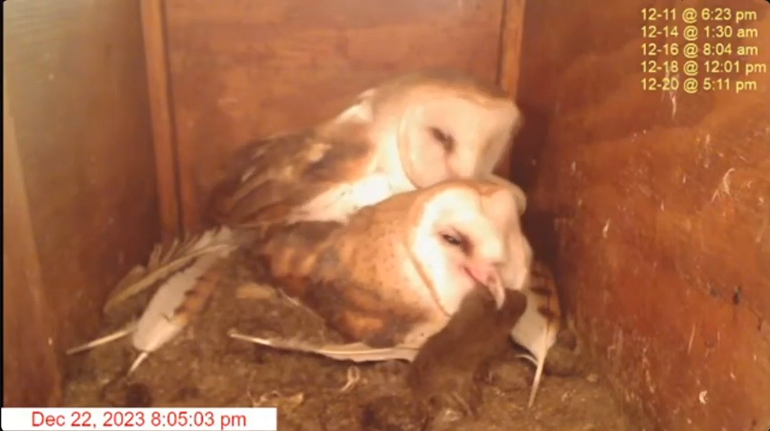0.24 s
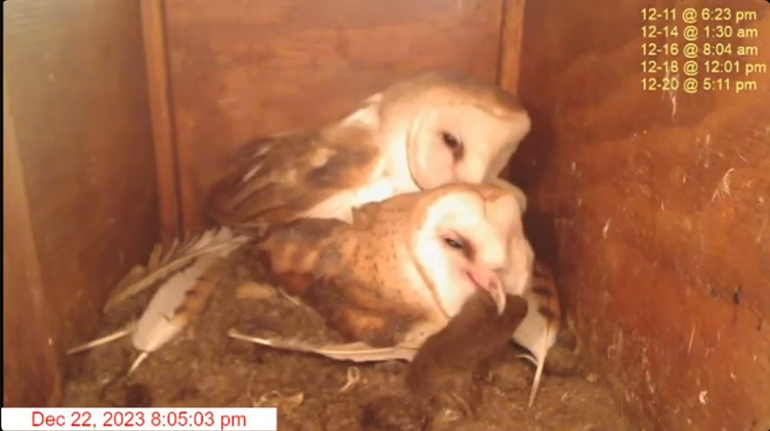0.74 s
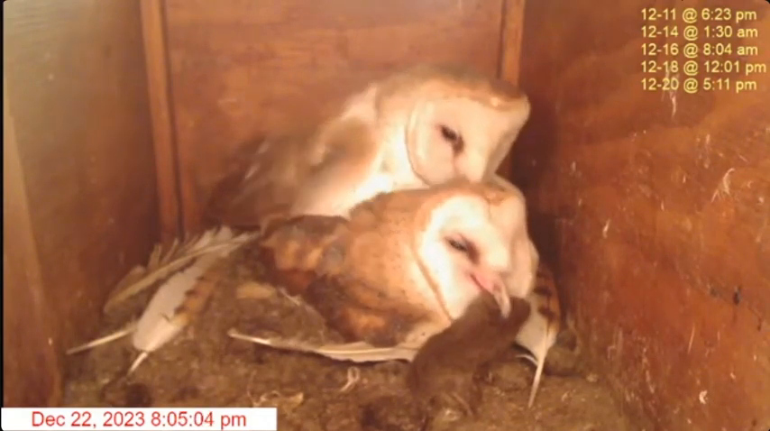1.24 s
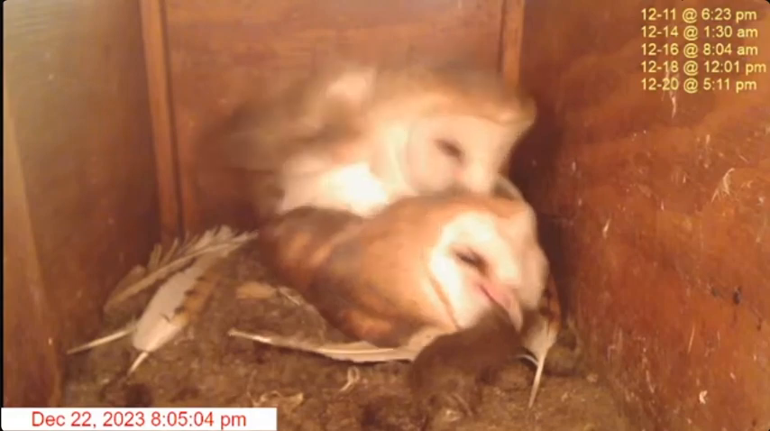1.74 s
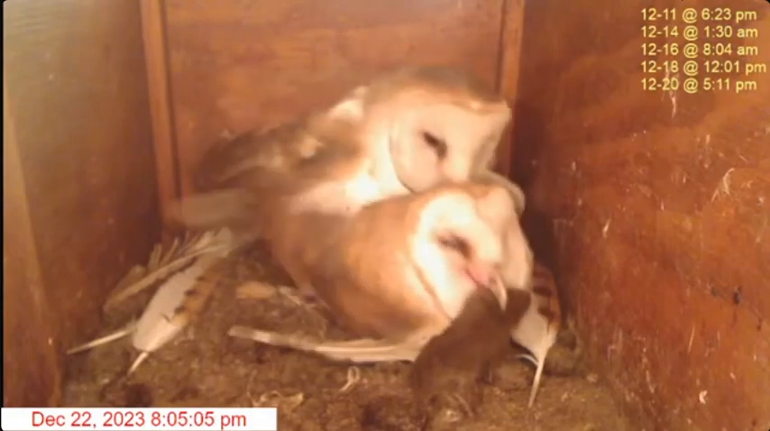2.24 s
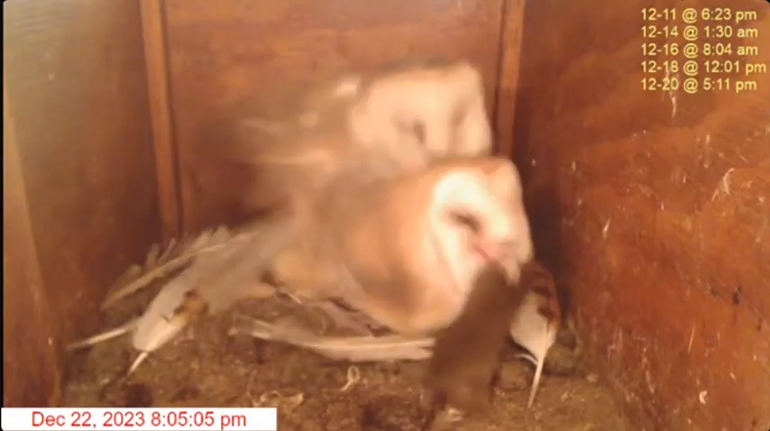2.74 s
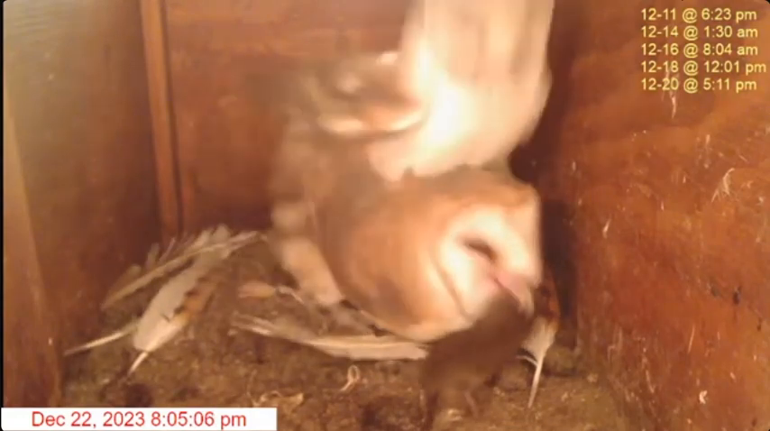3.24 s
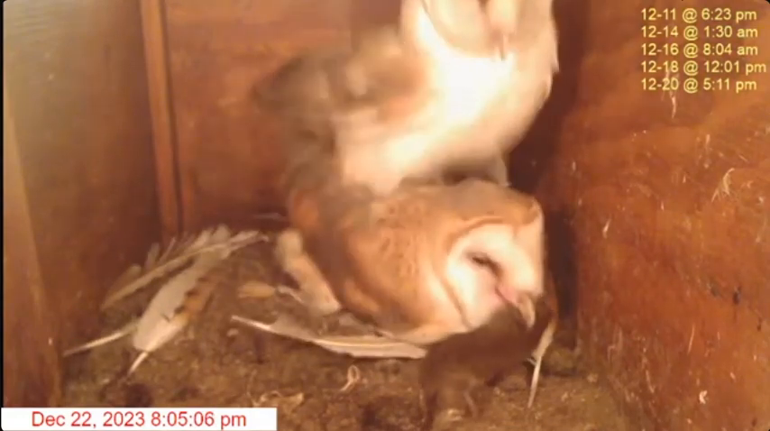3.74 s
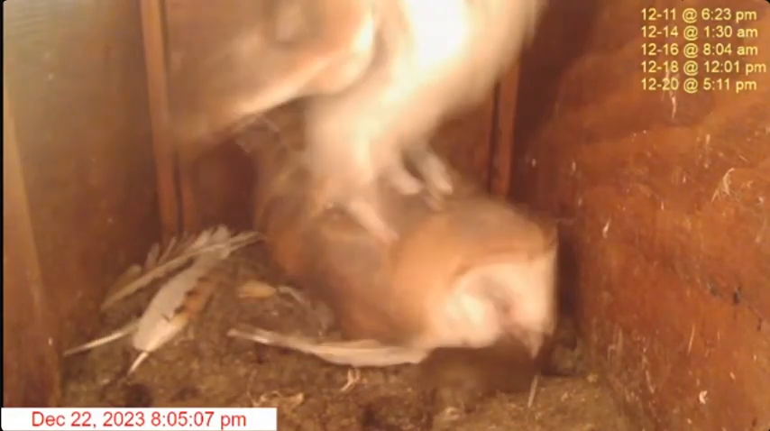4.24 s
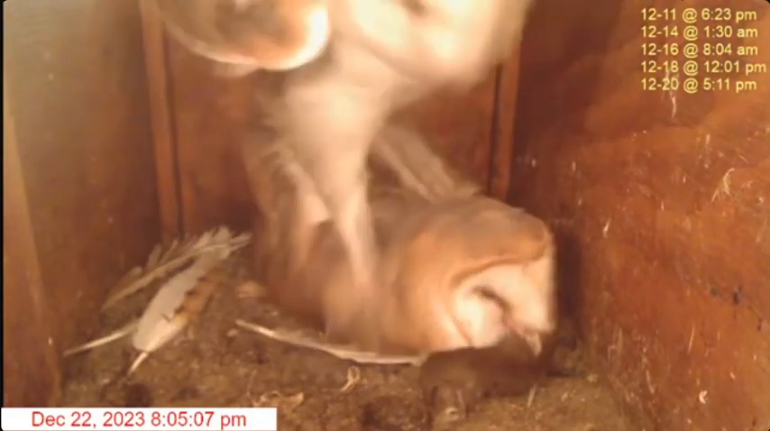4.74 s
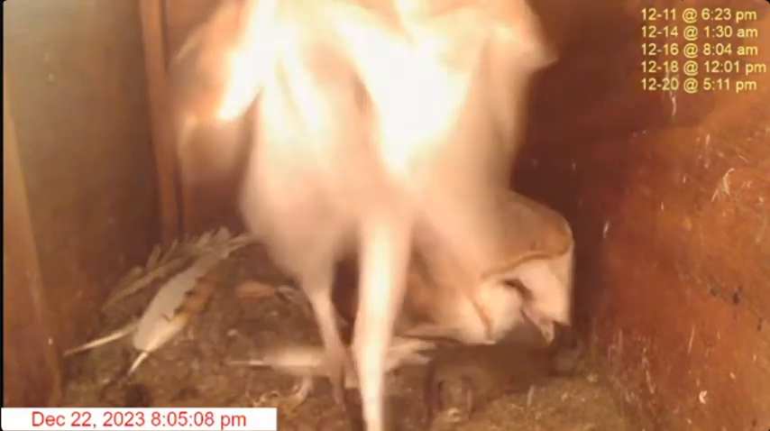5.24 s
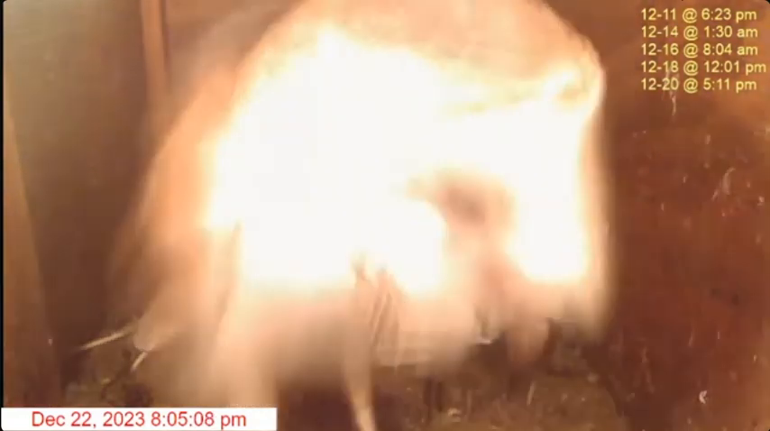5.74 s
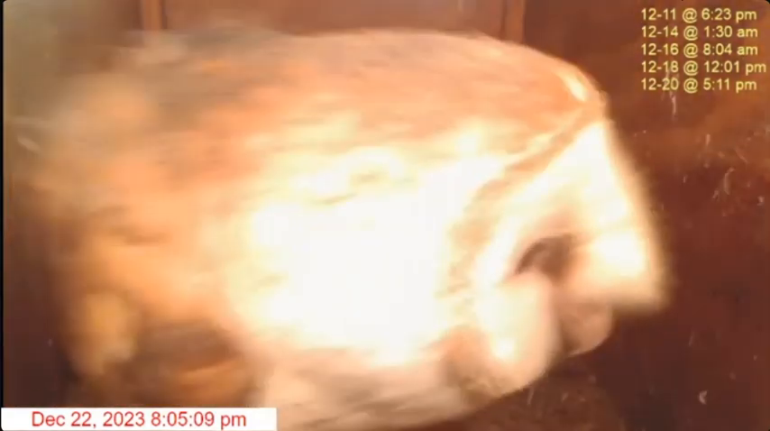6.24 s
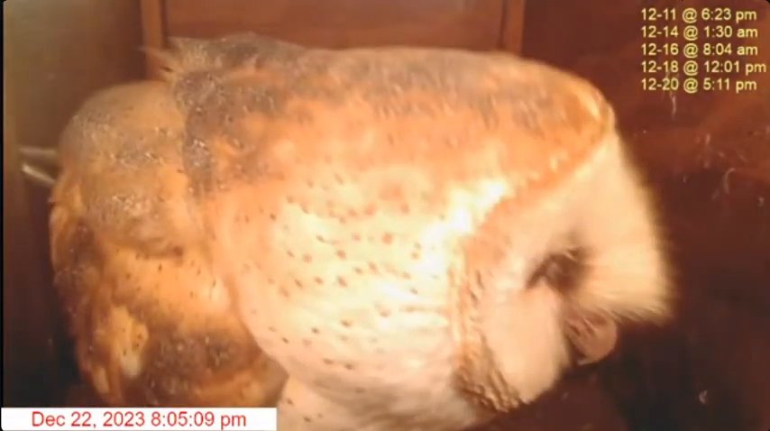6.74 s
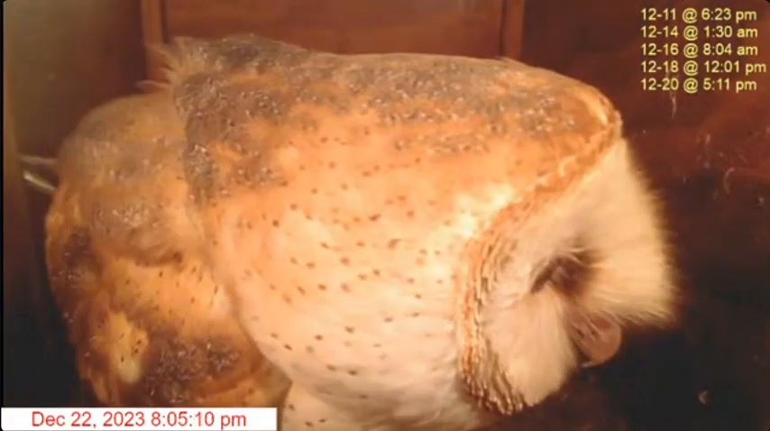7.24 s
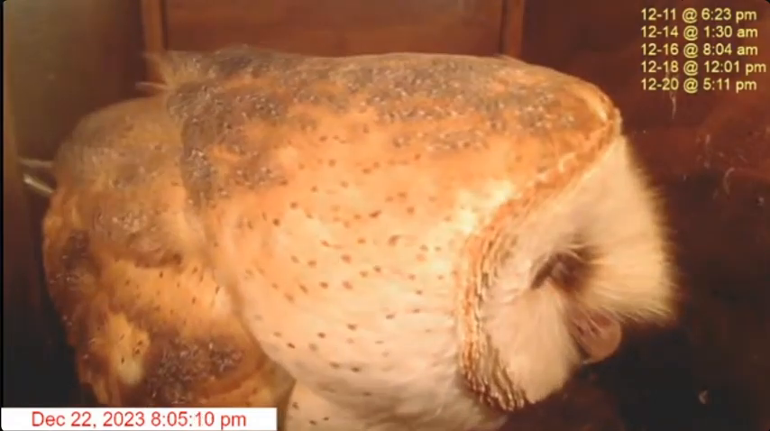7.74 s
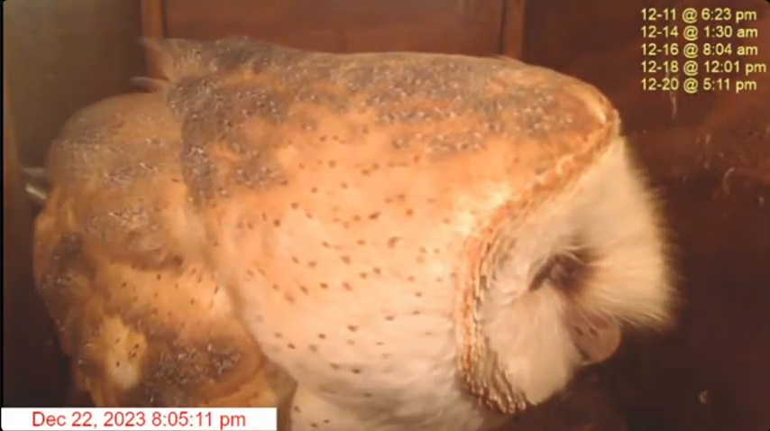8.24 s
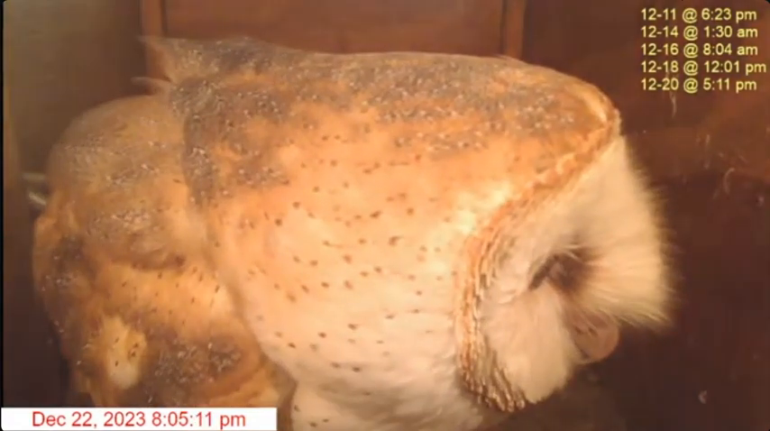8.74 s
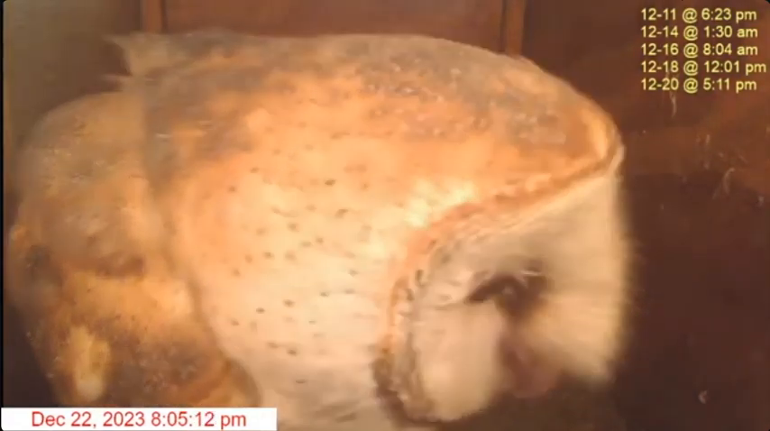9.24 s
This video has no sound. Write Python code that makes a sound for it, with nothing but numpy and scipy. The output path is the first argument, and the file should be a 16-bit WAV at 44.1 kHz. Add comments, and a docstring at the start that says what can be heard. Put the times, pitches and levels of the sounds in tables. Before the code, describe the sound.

Barn owls at close range in a dry, boxy wooden space: first a rattling squeal, a pause, then another squeal tearing into harsh raspy screams for about two seconds. Short chirpy squeals follow, then drawn-out, whistle-like calls with slight cracks and gaps between them. Dull padded foot bumps, one soft wing blow and light wall knocks accompany the movement over quiet low hum and trace hiss.

```python
"""Inside a wooden nest box, two barn owls call close to the microphone over a faint low hum.
Thin squeals, some led in by a beak click, are gliding tones with overtones; they rattle as the tone slips
and crack into rasps of patchy noise. Harsh screeches are smeared harmonics and noise through a changing throat.
Feet and knocks ring decaying wood modes; feathers, hoarse breaths and a wing slap are shaped noise."""
import sys
import numpy as np
from scipy import signal
from scipy.fft import rfft, irfft, next_fast_len
from scipy.io import wavfile
from scipy.ndimage import uniform_filter1d

SR = 44100
rng = np.random.default_rng(int(sys.argv[2]) if len(sys.argv) > 2 else 0)


def transcribe(signal):
    """Save signal, clipped to [-1, 1], as a 16-bit WAV file at the path in sys.argv[1]."""
    frames = np.atleast_2d(signal).T
    limited = np.clip(frames, -1, 1)
    pcm = np.round(limited * 32767).astype(np.int16)
    wavfile.write(sys.argv[1], SR, pcm)


N = 418068
T = np.arange(N) / SR


def amp(db):
    """Decibels to gain."""
    return 10 ** (np.asarray(db) / 20)


def evened(x):
    """Scales to rms 1."""
    return x / np.sqrt(np.mean(x ** 2) + 1e-20)


def add(mix, start_s, sound):
    """Mixes a sound in at its start time."""
    part = mix[max(round(start_s * SR), 0):][:len(sound)]
    part += sound[:len(part)]


def coloured(x, points):
    """Weights the spectrum of x by a (Hz, dB) curve, then scales to rms 1."""
    hz, db = np.transpose(points)
    f = np.fft.rfftfreq(len(x), 1 / SR)
    gain = amp(np.interp(np.log(f + 1), np.log(hz + 1), db))
    return evened(irfft(rfft(x) * gain, len(x)))


def noise(points, size):
    """Noise coloured by a (Hz, dB) curve, about rms 1."""
    return coloured(rng.standard_normal(next_fast_len(size)), points)[:size]


def wander(hz, size):
    """Smooth chance of about rms 1 that moves up to about hz times a second."""
    padded = next_fast_len(size + SR // 8)
    f = np.fft.rfftfreq(padded, 1 / SR)
    spectrum = rfft(rng.standard_normal(padded)) * np.exp(-.5 * (f / hz) ** 2)
    return evened(irfft(spectrum, padded))[:size]


def curves(rows):
    """Sample times and every column of a curve table, joined by straight lines."""
    s, *columns = np.transpose(rows)
    t = np.arange(s[0], s[-1], 1 / SR)
    return [t] + [np.interp(t, s, c) for c in columns]


def gate(t, start, end, edge=0.013):
    """Opens between start and end with smooth edges; spans shorter than an edge stay below one."""
    return np.sin(np.pi / 2 * np.clip(np.minimum(t - start, end - t) / edge + .5, 0, 1)) ** 2


def phase_of(hz):
    """Running phase of a frequency curve."""
    return 2 * np.pi * np.cumsum(hz) / SR


def faded(x):
    """Softens both ends over three thousandths of a second."""
    return x * signal.windows.tukey(len(x), .006 * SR / len(x))


def envelope(t, release):
    """Quick 9.3 ms attack, hold, smooth release."""
    attack = np.minimum((t - t[0]) / 0.0093, 1)
    return attack * np.sin(np.pi / 2 * np.clip((t[-1] - t) / release, 0, 1)) ** 2


def patchy(x):
    """Chaos favours one band, then another, for a few hundredths of a second at most."""
    z = signal.stft(x, nperseg=512)[2]
    patches = uniform_filter1d(rng.standard_normal(z.shape), 5, 0)  # smoothed over frequency
    patches = uniform_filter1d(patches, 3, 1)  # and over time
    return signal.istft(z * amp(2.3 * evened(patches)), nperseg=512)[1][:len(x)]


def saturated(x, drive=0.85):
    """Rounds off the largest swings, low-passing the distortion this adds at 8200 Hz."""
    sos = signal.butter(10, 8200, fs=SR, output="sos")
    return evened(x + signal.sosfiltfilt(sos, np.tanh(drive * x) / drive - x))


# colour of the hum and hiss in the box: (frequency_hz, relative_level_db)
HUM_COLOUR = [(12, -76.5), (20, -50), (48, -37.5), (91, -6), (114, -5.5), (161, -14), (244, -10.5),
              (352, -30.5), (810, -34.5), (1610, -30.5), (1960, -44.5), (7000, -57), (9100, -91.5),
              (15400, -120)]
HUM_DB = -56.5  # before its low part swells


def hum(swell_db=2.5, low_hz=330):
    """A low, uneven hum in the box under a trace of steady hiss: noise whose low part swells at random."""
    steady = noise(HUM_COLOUR, N)
    low = signal.sosfiltfilt(signal.butter(2, low_hz, fs=SR, output="sos"), steady)
    swell = amp(swell_db * wander(6.8, N))
    return amp(HUM_DB) * (steady + low * (swell - 1))


# squeals close to the microphone: (level_db before the next two changes, fade_db over the call,
# pinch_db change at the top pitch, edge_db lift of the fourth harmonic, rasp_db of the rattle's puffs,
# release_s, pitch curve [(time_s, pitch_hz before sag and drift)])
SQUEALS = [ (-19, -4, -2.5, 1.5, -5.5, 0.048, [(0, 2043), (.022, 2170), (.05, 2058), (.3, 2065),
           (.34, 1937)]), (-19, 0, -3, -0.5, -9, .06, [(1.033, 1648), (1.09, 1725), (1.145, 1829),
           (1.19, 1714), (1.28, 1808), (1.312, 1920), (1.355, 1734), (1.38, 1857), (1.52, 1915),
           (1.565, 1760)]), (-29.5, 1.5, 4, 1, -17.5, 0.025, [(1.555, 1600), (1.585, 1480), (1.64, 1526),
           (1.69, 1434)]), (-19, -1, -8.5, -2, -3.5, 0.06, [(1.682, 2158), (1.705, 2074), (1.79, 2043)]),
           (-23, -3.5, 2.5, -13, -10, 0.024, [(3.005, 2150), (3.045, 1910)]),
           (-19, -6, -4.5, 2, -10, 0.04, [(3.335, 2190), (3.36, 2060), (3.385, 1750)]),
           (-20, -0.5, -12.5, 1, -5.5, 0.047, [(3.764, 1650), (3.785, 1810), (3.83, 1780), (3.855, 1900),
           (3.9, 1780), (3.975, 1700), (4.028, 1910), (4.056, 1546)]),
           (-16, 2.5, -8.5, -2.5, -14.5, 0.03, [(4.487, 1552), (4.53, 1592), (4.568, 1779), (4.62, 1668),
           (4.69, 1725), (4.75, 1656), (4.82, 1718), (4.875, 1654), (4.915, 1669), (4.972, 1606),
           (5.0, 1450)]), (-27.5, -2, -1, -27, -20, 0.0099, [(5.066, 2350), (5.077, 2270), (5.095, 2130)]),
           (-20.5, -8, 9, -44, -20, 0.013, [(5.122, 2330), (5.138, 2100), (5.147, 1675), (5.167, 1360)]),
           (-13.5, -5.5, -11.5, -6.5, -17.5, 0.04, [(5.527, 1572), (5.615, 1659), (5.7, 1634), (5.86, 1640),
           (5.895, 1692), (5.92, 1606), (6.005, 1697), (6.07, 1638), (6.114, 1665), (6.15, 1579),
           (6.21, 1714), (6.293, 1540)]), (-15.5, 0, -7, 12.5, -12, 0.048, [(7.22, 1580), (7.3, 1689),
           (7.352, 1598), (7.415, 1639), (7.55, 1605), (7.63, 1537), (7.658, 1514)]),
           (-17, 1, -6, 11.5, -10, 0.037, [(8.735, 1568), (8.836, 1715), (8.89, 1610), (8.94, 1656),
           (9.0, 1616), (9.07, 1660), (9.1, 1551), (9.14, 1507)])]
# stretches where the voice rattles: (start_s, end_s, slip_depth 0-1)
RATTLES = [(0, 0.293, 0.74), (1.038, 1.064, 0.91), (1.502, 1.676, .9), (1.718, 1.78, 0.26),
           (3.763, 3.817, .7), (3.87, 3.89, 0.95), (4.007, 4.064, 0.87), (4.479, 4.542, 0.69),
           (4.741, 4.764, 0.57), (4.879, 4.899, 0.28), (5.118, 5.141, 0.44), (5.537, 5.585, 0.68),
           (5.663, 5.681, 0.55), (5.794, 5.805, 0.7), (7.22, 7.286, .72), (7.357, 7.373, 0.53),
           (7.443, 7.601, 0.56), (8.738, 8.793, 0.98), (8.81, 8.828, 0.41), (8.895, 9.054, 0.66)]
# overtones by pitch, before the edge lift:
# (pitch_hz, second_db, third_db, fourth_db relative to the first harmonic)
OVERTONES = [(1510, -29, -41, -53), (1616, -25.5, -49, -31), (1666, -23, -39, -25.5),
             (1713, -19, -21.5, -21.5), (1810, -13, -7.5, -10.5), (1916, -11, -8, -12.5),
             (2000, -13, -7, -28.5), (2240, -13.5, -17.5, -39.5)]
SECOND_EDGE_SHARE, THIRD_EDGE_SHARE = .15, 0.34  # share of a call's edge_db given to these harmonics
FIFTH_DB = -18  # relative to the fourth harmonic
RECORDER_TOP_HZ, RECORDER_FALL_DB_PER_HZ = 8050, 0.1  # the recorder's top edge dims the fifth harmonic
LEAK_DB = -46.5  # air under even the purest note, relative to the call's level
PINCH_WIDTH_HZ = 46  # how near the top pitch the pinch acts
RATTLE_SAG = .055  # share of the pitch lost in a full rattle
# colour of the puffs in a rattle: (frequency_hz, relative_level_db)
PUFF_COLOUR = [(30, -19.5), (400, -0.5), (800, -9.5), (1100, 12), (1900, -5.5), (2300, 5), (2800, 2),
               (3700, -9), (4300, 2), (5000, -18.5), (6600, 1.5), (7900, -9.5), (8600, -27), (9300, -59)]


def squeal(db, fade_db, pinch_db, edge_db, rasp_db, release, pitch, slip_hz=135, slip_lag=1.9,
           flutter_hz=380, flutter=0.11, shiver=0.33, air_db=-15):
    """The syrinx whistles; in a rattle it slips again and again, losing strength and lagging in phase."""
    t, hz = curves(pitch)
    size = len(t)
    depth = sum(np.clip(d, 0, 1) * gate(t, a, b) for a, b, d in RATTLES)
    cracked = np.clip(sum(gate(t, s - w / 2, s + w / 2) for s, w, _ in STUTTER + CRACKS), 0, 1)
    pinch = np.exp((hz - hz.max()) / PINCH_WIDTH_HZ)
    swell = envelope(t, release)  # applied twice to overtones and rasp, so they die sooner than the note
    level = swell * amp(db + fade_db * np.linspace(0, 1, size) + pinch_db * pinch)
    hz = hz * (1 - RATTLE_SAG * depth)

    # the harder the bird presses, the higher and, broadly, the brighter the note
    steps, *harmonics = np.transpose(OVERTONES)
    second_db, third_db, fourth_db = [np.interp(hz, steps, h) for h in harmonics]
    second_db = second_db + SECOND_EDGE_SHARE * edge_db
    third_db = third_db + THIRD_EDGE_SHARE * edge_db
    fourth_db = fourth_db + edge_db
    fifth_db = fourth_db + FIFTH_DB - RECORDER_FALL_DB_PER_HZ * np.maximum(5 * hz - RECORDER_TOP_HZ, 0)

    # the pitch sags into each crack and comes out of it high
    bend = sum((t - s) / w * np.exp(-((t - s) / w) ** 2) for s, w, _ in STUTTER + CRACKS)
    waver = wander(15, size)  # the note softens as it drifts sharp
    strain = amp(np.minimum(third_db, -8))  # a pressed note is less steady
    drift = .11 * bend + (.002 + .035 * strain) * wander(70, size) + .005 * waver

    cycle = phase_of(slip_hz * np.exp(0.41 * wander(90, size)))
    slips = depth * np.cos(cycle / 2) ** 6
    lag = slip_lag * depth * np.sin(cycle) / (2 - np.cos(cycle)) * wander(64, size)
    lag += (flutter * depth + 0.0062) * wander(flutter_hz, size)  # the clear note keeps a trace of flutter
    phase = phase_of(hz * (1 + drift))
    levels = [second_db, third_db, fourth_db, fifth_db]
    overtones = sum(amp(h) * np.sin(k * phase + 2 * lag) for k, h in enumerate(levels, 2))

    strength = (1 - slips) * (1 + shiver * depth * wander(flutter_hz, size))
    strength *= (1 + 0.041 * depth) * (1 - .5 * cracked)
    strength *= amp(-.7 * waver + 4 * strain * wander(50, size))
    # pressed hard, a slower vibration joins in
    sidebands = 1 + amp(third_db - 7.5) * np.sin(phase / np.e + wander(60, size))
    tone = np.sqrt(2) * strength * (np.sin(phase + lag) + swell * overtones * sidebands)

    # a pressed voice leaks more air
    leak = amp(LEAK_DB) + amp(air_db + np.maximum(third_db, fourth_db - 11))
    air = leak * noise(CRACK_COLOUR, size)
    # each slip lets a puff of air through
    puffs = (.45 * depth + 1.1 * slips) * noise(PUFF_COLOUR, size)
    return t[0], faded(level * (tone + air + swell * amp(rasp_db) * puffs))


# single short rasps: (middle_s, length_s, level_db before the common cut)
CRACKS = [(1.112, .006, -14), (1.211, 0.0077, -12.5), (1.275, 0.0088, -12), (1.407, 0.015, -12),
          (1.444, 0.011, -15), (1.506, 0.0037, -10), (3.772, 0.0058, -18.5), (3.805, 0.0035, -23),
          (3.842, 0.008, -14), (3.871, 0.0112, -12.5), (3.945, 0.0058, -16.5), (3.982, 0.008, -23),
          (4.015, 0.014, -12.5)]
# the opening call stutters: a run of eight evenly spaced cracks that grows louder, same columns
STUTTER_START_S, STUTTER_PERIOD_S, STUTTER_LENGTH_S = .05, .0327, .019
STUTTER_DB, STUTTER_GROWTH_DB = -15, 0.61  # first crack before the common cut, rise per crack
STUTTER = [(STUTTER_START_S + k * STUTTER_PERIOD_S, STUTTER_LENGTH_S, STUTTER_DB + k * STUTTER_GROWTH_DB)
           for k in range(8)]
# colour of cracks and leaking air: (frequency_hz, relative_level_db)
CRACK_COLOUR = [(20, -20.5), (150, 1.5), (400, -10.5), (1000, -4.5), (1500, 7.5), (2200, 3.5), (3000, -6.5),
                (4200, 0), (4800, -4.5), (5600, 2), (7500, 1), (8300, -14), (9100, -40), (16000, -52)]


def cracks(cut_db=-2.0):
    """For a few thousandths of a second the syrinx turns chaotic: gated patchy noise with rounded peaks."""
    level = sum(amp(db) * gate(T, s - w / 2, s + w / 2, edge=0.0042) for s, w, db in STUTTER + CRACKS)
    return amp(cut_db) * level * saturated(evened(patchy(noise(CRACK_COLOUR, N))))


# bill closing: (start_s, level_db before the gain and the noise)
BEAK_CLICKS = [(0.994, -20), (3.707, -24.5), (4.395, -26), (5.44, -22), (7.172, -25.5), (8.684, -25)]
# colour of the bill: (frequency_hz, relative_level_db)
BEAK_COLOUR = [(100, -15), (400, -16), (750, 12), (1200, -2), (1600, 5), (2300, 2), (3100, -49.5),
               (4300, -29), (5200, -31), (7000, -23.5), (9000, -61)]


def beak_click(s, db, lead=.004, ring=0.0013, tail_db=-25, tail=0.04, gain_db=-7):
    """The bill closes with a soft snap, and the box rings briefly: a noise pulse with a faint tail."""
    t = np.arange(SR // 16) / SR
    snap = (t / ring) ** 4 * np.exp(-t / ring)
    box_tail = amp(tail_db) * np.exp(-t / tail) * np.minimum(t / lead / 2, 1)
    shape = snap / snap.max() + box_tail
    return s - lead, amp(db + gain_db) * shape * noise(BEAK_COLOUR, len(t))


# curves of the screeches; the first two join into one long screech with a brief dip:
# (time_s, level_db before throb and grain,
# throat_posture: 0 = shut growl, 1 = wide scream, 2 and above = hollow rasp)
SCREECHES = [
    [(1.455, -32, 0.29), (1.52, -25, 0.66), (1.59, -26.5, 0), (1.68, -25.5, 0.0062), (1.72, -19, 0.92),
     (1.85, -16, 0.95), (2.12, -15.5, 1.085), (2.54, -15.5, 1.42), (2.6, -19, 1.93), (2.732, -16.5, 1.9)],
    [(2.718, -23.5, 1.87), (2.755, -18, 2.6), (2.78, -23.5, 1.83), (2.835, -20, 1.7)],
    [(3.004, -29, .4), (3.05, -16.5, 0.81), (3.17, -16.5, 0.87), (3.33, -16, 1.14), (3.38, -34, 1.13)],
]
# colours of the three throat postures: (frequency_hz, relative_level_db)
GROWL = [(100, -28), (450, -9), (1200, -6), (1480, -1), (1800, -7.5), (3100, -26), (3800, -30.5),
         (4900, -36.5), (6300, -29), (8300, -43.5), (9000, -79)]
SCREAM = [(20, -10), (55, -13), (155, 4), (400, -10), (1100, -3.5), (1700, -3), (2400, -1), (2850, -6.5),
          (4300, -5.5), (5400, -2), (7700, -4), (8300, -18.5), (9100, -36), (16000, -43.5)]
HOLLOW = [(25, -7.5), (150, 2), (700, -2), (1500, -2), (2250, -17.5), (2750, -8.5), (3200, 1), (4100, -17),
          (5000, -9.5), (6300, 3.5), (7900, -4), (8500, -19.5), (9300, -50.5)]


def screech(rows, pitch_hz=2100, sag=.24, voiced_db=-1, throb_hz=29.9, throb_db=2.0, grain=0.15, release=0.039):
    """Chaotic vibration: smeared harmonics and turbulence pass a changing throat, throbbing about 30 Hz."""
    t, db, posture = curves(rows)
    size = len(t)
    hz = pitch_hz * (1 - sag * np.minimum(2 * abs(posture - 1), 1))  # highest in the wide scream
    lurch = .12 * np.clip(posture, .3, 1) * wander(45, size)
    chaos = .05 + .1 * np.exp(.7 * wander(30, size))  # at its low moments the syrinx nearly finds a tone
    phase = phase_of(hz * (1 + lurch + chaos * wander(500, size)))
    turbulence = rng.standard_normal(size)
    harmonics = sum(np.sin(k * phase) for k in range(1, 5)) / 2
    source = patchy(turbulence + amp(voiced_db) * harmonics)

    shares = [np.maximum(1 - abs(np.clip(posture, 0, 2) - k), 0) for k in range(3)]
    throats = [GROWL, SCREAM, HOLLOW]
    voice = sum(share * coloured(source, throat) for share, throat in zip(shares, throats))
    throb = np.sin(phase_of(throb_hz * (1 + 0.14 * wander(19.2, size))))
    throb *= np.interp(t, [2.05, 2.2, 3.1], [1.2, .45, .7])  # steadies after 2 s, then partly returns
    level = amp(db + throb_db * throb) * (1 + grain * wander(200, size))
    return t[0], envelope(t, release) * level * saturated(evened(voice))


# soft brushes of feathers, and two hoarse breaths of the voice near 5.1 s:
# (start_s, length_s, level_db before the swell and decay)
BRUSHES_AND_BREATHS = [(2.896, 0.08, -45), (2.96, 0.06, -47), (5.035, 0.1, -46.5), (5.086, 0.091, -41),
                       (5.934, 0.11, -50.5)]
# colour of both: (frequency_hz, relative_level_db)
BRUSH_COLOUR = [(30, -20.5), (400, -2.5), (800, -10), (1200, 9.5), (2600, 7), (3700, -3.5), (6500, -3.5),
                (7800, -17), (9300, -53)]


def brush_or_breath(s, length, db, clumps_db=3, rise=0.011):
    """A brush of feathers or a hoarse breath, in small clumps: noise that swells quickly and dies away."""
    t = np.arange(0, length, 1 / SR)
    shape = np.minimum(t / rise, 1) * (1 - t / length)
    clumps = amp(clumps_db * wander(200, len(t)))
    return s, amp(db) * shape * evened(noise(BRUSH_COLOUR, len(t)) * clumps)


def ringing_wood(db, modes, rise=0.054):
    """A padded push sets decaying wood modes going, each up to 6 % off its listed pitch."""
    t = np.arange(SR // 3) / SR
    ring = sum(amp(level - 60 * t / t60) * np.sin(2 * np.pi * hz * rng.uniform(.94, 1.06) * t)
               for hz, level, t60 in modes)
    ring *= 1 - np.exp(-t / rise)
    return amp(db) * ring / abs(ring).max()


# feet against the box: (start_s, peak_db)
BUMPS = [(4.606, -21), (4.929, -41), (5.26, -34), (5.452, -27), (5.827, -39.5), (5.994, -38), (6.1, -35),
         (6.151, -39), (6.189, -32), (7.097, -40.5), (7.582, -37), (7.716, -32.5), (7.776, -34.5),
         (7.883, -35.5), (8.111, -39.5)]
# modes of the box: (pitch_hz, relative_level_db, t60_s)
BOX_MODES = [(98.2, 4.5, 0.15), (111.1, 4.5, 0.14), (158, -2, 0.091), (240, -14.5, 0.21)]


def foot_bump(s, db):
    """A padded foot pushes on the wood and sets the low modes of the box going."""
    return s, ringing_wood(db, BOX_MODES)


# a wing strikes the wall: (start_s, level_db before the noise)
WING_SLAP = (4.612, -28.5)
# colour of the slap: (frequency_hz, relative_level_db)
SLAP_COLOUR = [(100, -15.5), (450, 7), (900, -10.5), (1500, -12), (6000, -50.5)]


def wing_slap(s, db, swell=0.0065):
    """A soft, dull blow of feathers on wood: one short swell of noise."""
    t = np.arange(SR // 8) / SR
    return s, amp(db) * t / swell * np.exp(1 - t / swell) * noise(SLAP_COLOUR, len(t))


# lighter knocks on the wall: (start_s, peak_db)
KNOCKS = [(5.031, -41), (6.54, -44), (6.657, -36.5), (6.825, -50.5), (8.616, -46)]
# the wall's mode: (pitch_hz, relative_level_db, t60_s)
WALL_MODES = [(239, 0, 0.1)]


def wall_knock(s, db):
    """A lighter knock rings only the wall's single mode."""
    return s, ringing_wood(db, WALL_MODES)


def scene():
    """Voices, beaks, feet and feathers over the hum."""
    mix = hum() + cracks()
    for row in SQUEALS:
        add(mix, *squeal(*row))
    for row in BEAK_CLICKS:
        add(mix, *beak_click(*row))
    for rows in SCREECHES:
        add(mix, *screech(rows))
    for row in BRUSHES_AND_BREATHS:
        add(mix, *brush_or_breath(*row))
    for row in BUMPS:
        add(mix, *foot_bump(*row))
    add(mix, *wing_slap(*WING_SLAP))
    for row in KNOCKS:
        add(mix, *wall_knock(*row))
    return mix[None]


EDGE_HZ = 15800


def record(dry):
    """A steep low-pass at the very top."""
    lowpass = signal.firwin(511, EDGE_HZ, window=("kaiser", 9), fs=SR)
    return signal.oaconvolve(dry, lowpass[None], "same")


dry = scene()
out = record(dry)
transcribe(out)
```